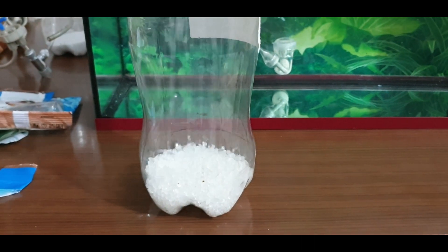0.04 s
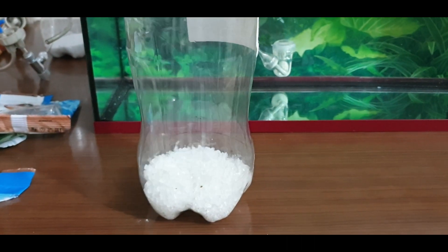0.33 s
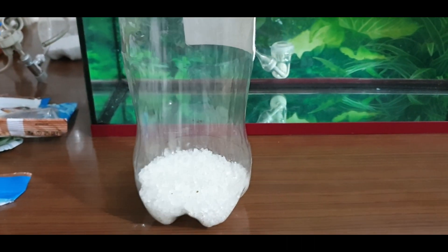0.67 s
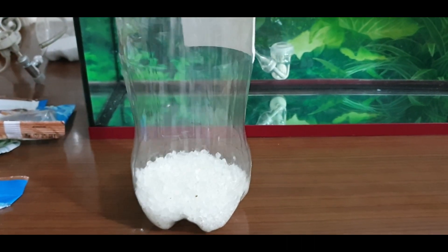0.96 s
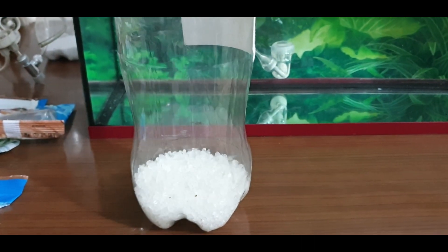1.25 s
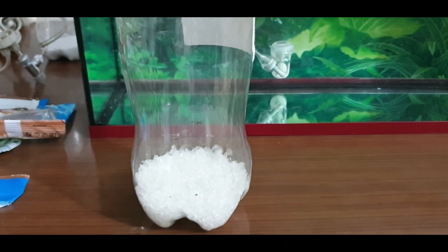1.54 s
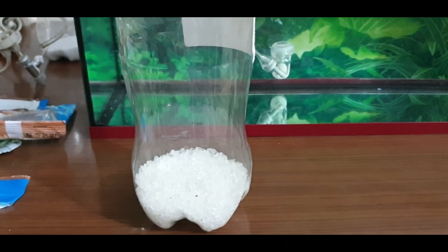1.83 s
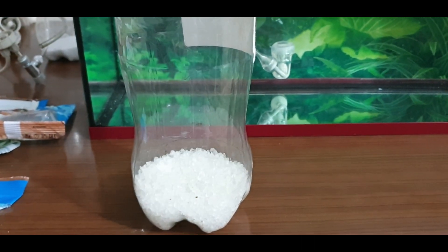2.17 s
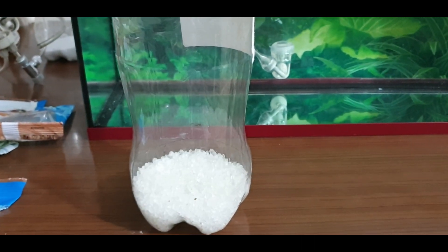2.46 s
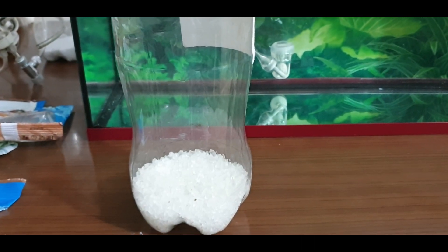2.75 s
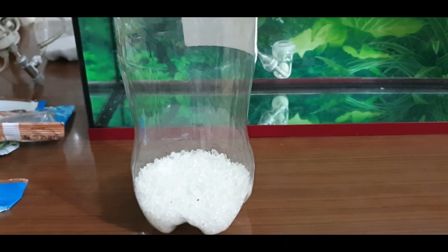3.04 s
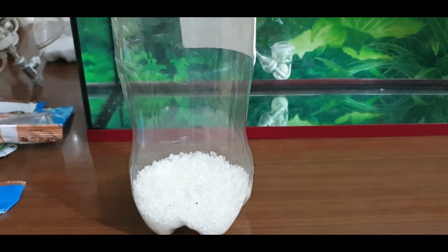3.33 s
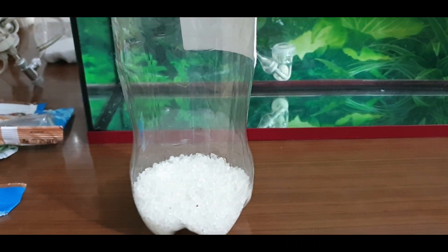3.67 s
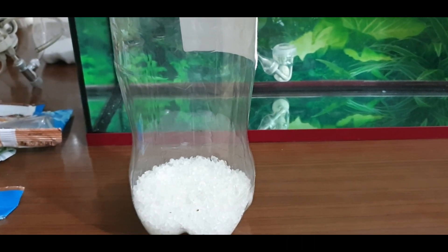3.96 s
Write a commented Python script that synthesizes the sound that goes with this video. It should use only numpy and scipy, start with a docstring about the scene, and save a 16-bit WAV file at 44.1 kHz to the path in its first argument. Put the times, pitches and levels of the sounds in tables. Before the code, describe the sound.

A bright rattle of crystals poured into a plastic bottle dwindles to sparse crackles.

```python
"""Crystals poured into a plastic bottle

Dry crystals pour into a thin plastic bottle on a table, in a small quiet room. Each landing rings the
wall, knocks the bottle and adds a bright tick; the small grains also thud on the heap. After two
seconds the dense rattle thins out to single ticks and crackles. Now and then a low hollow hum swells
up, probably the air in the bottle as it is jostled."""
import sys
import numpy as np
from scipy import signal
from scipy.fft import rfft, irfft
from scipy.io import wavfile
from scipy.ndimage import uniform_filter1d

SR = 44100
rng = np.random.default_rng(int(sys.argv[2]) if len(sys.argv) > 2 else 0)


def digitize_waveform(pressure):
    """Quantize a signal to 16-bit integers and store it at the path in sys.argv[1].

    Rows of a 2-D input are taken as channels; values are limited to [-1, 1].
    """
    field = np.atleast_2d(pressure).T
    bounded = np.clip(field, -1, 1)
    quanta = np.round(bounded * 32767).astype(np.int16)
    wavfile.write(sys.argv[1], SR, quanta)


N = 176400
IMPACT_SAMPLES = 2048
TIME = np.arange(N) / SR
IMPACT_HZ, SCENE_HZ = np.fft.rfftfreq(IMPACT_SAMPLES, 1 / SR), np.fft.rfftfreq(N, 1 / SR)

# Tone of the thin wall's ring: (frequency [Hz], gain [dB])
WALL_EQ = [(400, -31), (1000, -9.5), (1350, -7), (1750, 1), (2100, -1.5), (2430, 1.5), (2900, -2.5),
           (3700, 0), (4900, -1.5), (6200, -9.5), (8000, -15), (16000, -25.5)]
# Tone of the whole bottle's knock: (frequency [Hz], gain [dB])
KNOCK_EQ = [(120, -50), (300, -26.5), (420, -10), (620, -8.5), (760, -5.5), (860, 2), (1020, -3),
            (1280, -6), (1700, -20.5), (3000, -36)]
# Tone of the bright contact tick: (frequency [Hz], gain [dB])
TICK_EQ = [(2500, -77), (5500, 3), (8000, -6), (10000, -3.5), (12500, 0), (15800, -2)]
# Tone of the dull thud on the heap: (frequency [Hz], gain [dB])
HEAP_EQ = [(100, -40.5), (300, -16.5), (410, -2.5), (470, 2), (600, -6.5), (720, 1.5), (860, 7),
           (1000, -15.5), (2000, -68.5)]
# Envelope of the stream of small grains: (time [s], level [dB])
FLOW_ENVELOPE = [(0, -24.5), (.11, -25), (.2, -31), (.29, -31), (.39, -29), (.5, -26), (.9, -28.5),
                 (1.3, -30), (1.6, -31), (1.75, -32), (1.85, -41.5), (2.0, -50), (2.1, -49.5), (2.2, -61.5),
                 (2.6, -62), (2.9, -58), (3.0, -65), (3.35, -49.5), (3.56, -70), (3.62, -59), (4.0, -57.5)]
# Swells of the low hum: (time [s], relative boom level [dB], relative note level [dB])
HUM_ENVELOPE = [(0.0, -43, -47), (0.04, -61, -52), (0.22, -55, -58), (0.51, -57.5, -65.5), (0.7, -56, -53),
                (0.78, -55, -67), (0.98, -57, -46), (1.02, -46.5, -58), (1.27, -45, -40.5),
                (1.51, -60, -57.5), (1.55, -56, -61), (1.95, -61, -46.5), (1.99, -73, -72),
                (2.43, -73, -88), (2.53, -54.5, -49), (2.76, -73, -77), (2.86, -55, -75), (2.99, -84, -76),
                (3.1, -55.5, -56), (3.35, -53, -41), (3.39, -55.5, -38.5), (3.74, -83, -80),
                (3.93, -72, -72), (4.0, -66, -89)]
# Tone of the hum's broad boom: (frequency [Hz], gain [dB])
BOOM_EQ = [(25, -42), (55, -19.5), (80, -16), (97, 2.5), (110, -16), (125, -2), (160, -19), (178, -7.5),
           (197, -16), (212, -9), (228, -8), (245, -16.5), (300, -18.5), (500, -47)]
# Landings of the larger crystals: (time [s], relative ring level [dB], ring pitch [Hz],
# knock re ring [dB], tick re ring [dB], decay time [s])
CRYSTAL_HITS = [(0.0174, -21.5, 2530, -15, -23, 0.0014), (0.0392, -25.5, 2930, -2, -20, 0.0013),
                (0.0736, -25, 2960, -14.5, -20, 0.006), (0.113, -27.5, 2380, -19, -17, 0.0034),
                (0.126, -28, 2770, -6, -13, 0.0035), (0.2273, -20, 2660, -15, -12, 0.0008),
                (0.42, -28, 4000, -33, -12, 0.004), (0.466, -29.5, 2420, -6, -18, 0.0014),
                (0.495, -27.5, 3100, -5, -19, 0.0044), (0.535, -45, 2730, -22, -18, 0.0014),
                (0.7125, -26, 2240, -5, -22, 0.0052), (0.77, -31, 3280, -30, -19, 0.005),
                (0.8675, -28, 3600, -23, -5, 0.0049), (0.982, -26.5, 4000, -12, -13, 0.0026),
                (1.0723, -23.5, 3000, -13, -10, 0.0039), (1.14, -23, 2220, -17, -13, 0.0095),
                (1.252, -29, 2600, -30, -18, 0.0035), (1.3222, -20.5, 1960, -7, -15, 0.0031),
                (1.367, -25, 2690, -10, -8, 0.0041), (1.3967, -23, 2420, -6, -20, 0.0014),
                (1.436, -27, 2580, -11.5, -8.5, 0.0042), (1.5234, -27, 3620, -7.5, -25, 0.011),
                (1.5633, -25.5, 2560, -13, -17, 0.0016), (1.6826, -28.5, 4070, -39, -2.5, 0.0019),
                (1.716, -30, 2330, -21, -10, 0.0028), (1.7728, -29.5, 2400, -7, -22, 0.0043),
                (1.8163, -32.5, 2050, -4, -14, 0.0033), (1.842, -36, 3970, -7, -2, 0.0021),
                (1.8606, -27.5, 2020, -7.5, -12, 0.002), (1.893, -40, 2400, -23, -1.5, 0.0034),
                (1.919, -42.5, 3150, 1, -8, 0.0047), (1.934, -34, 3880, -15, -6, 0.0026),
                (1.9504, -37, 4090, -9.5, -7, 0.0043), (1.98, -36, 3860, -6, 5.5, 0.0012),
                (1.989, -30, 2270, -11, -28, 0.0071), (2.031, -37, 3660, -4, -9, 0.0026),
                (2.0498, -26, 3900, -24, -9, 0.00168), (2.063, -43.5, 3410, -1.5, 4, 0.003),
                (2.1217, -41, 2190, -12, 2, 0.0017), (2.1617, -47.5, 2240, -6.5, 4, 0.0043),
                (2.1917, -42.5, 2910, -16, -3, 0.0027), (2.247, -33, 3440, -19, -14.5, 0.0027),
                (2.298, -54, 4000, -17, 5, 0.00085), (2.308, -48.5, 4490, -12, -6, 0.0024),
                (2.3405, -30, 3500, -19, -14, 0.0023), (2.354, -41.5, 3080, -7, -21, 0.0019),
                (2.4634, -34, 2000, -11.5, -20, 0.0043), (2.469, -39, 1920, -19, -19, 0.0035),
                (2.5055, -50.5, 4000, -7, 3.5, 0.00063), (2.581, -49.5, 2300, -17, -17, 0.0017),
                (2.6265, -38.5, 3420, -44, -6.5, 0.00094), (2.6584, -41.5, 2760, -16.5, 2.5, 0.002),
                (2.6967, -41, 3000, -22, -0.5, 0.0045), (2.734, -47, 2140, -14, -1.5, 0.0035),
                (2.7663, -42, 3720, -25, -11, 0.0039), (2.7953, -46.5, 1920, 0, -10, 0.0043),
                (2.8005, -44, 2420, -12, -21, 0.0023), (2.8553, -34.5, 2900, -15.5, 1, 0.0012),
                (2.8835, -38, 2670, -20, -6, 0.0043), (2.8878, -45.5, 2460, -23, 0, 0.0055),
                (2.9093, -41.5, 3400, -13.5, -1, 0.0043), (2.92, -43.5, 3430, -12, -0.5, 0.0033),
                (2.968, -57.5, 2100, 5.5, -9, 0.001), (2.983, -52, 2530, -14, 2, 0.002),
                (3.0227, -46.5, 2700, -7.5, -8, 0.0013), (3.0509, -52.5, 2400, -4, -4, 0.006),
                (3.0884, -48, 3600, -9, -11, 0.004), (3.1085, -35.5, 3130, -15, 1, 0.0015),
                (3.129, -51.5, 2700, 4, -13, 0.0041), (3.157, -46, 3690, -8, -3, 0.0041),
                (3.2002, -39, 3200, -11.5, -7, 0.0027), (3.2123, -45.5, 2660, -11.5, -1, 0.0025),
                (3.3054, -41, 2880, -42, 0.5, 0.00136), (3.33, -44, 2930, -43, -11, 0.0011),
                (3.3545, -44.5, 3300, -10, -8, 0.0022), (3.391, -43, 1700, -8, -13, 0.0034),
                (3.4637, -35, 2700, -13, -15, 0.0019), (3.48, -53, 2520, -8, 9.5, 0.0019),
                (3.5066, -41.5, 3830, -27, -3, 0.0036), (3.5307, -40, 4240, -25, -7, 0.0049),
                (3.5516, -48.5, 3560, -2, 0, 0.011), (3.6166, -35.5, 3680, -18, -5, 0.0036),
                (3.6337, -28, 3000, -26, -7, 0.0016), (3.6973, -24, 2530, -20.5, -5.5, 0.0011),
                (3.705, -50, 2500, -4, -8, 0.0027), (3.713, -55, 2210, 10, -8, 0.0043),
                (3.7726, -44.5, 4160, -17, -1, 0.0022), (3.7882, -34.5, 3100, -15.5, -14, 0.0031),
                (3.8203, -38.5, 3460, -13.5, -10, 0.00073), (3.9216, -43, 2030, -1.5, -33, 0.0031),
                (3.932, -43, 2040, -5.5, -15, 0.0034)]
# Clacks that leave a ping in the wall: (time [s], pitch [Hz], peak level [dB], T60 [s])
WALL_PINGS = [(.2292, 2370, -10.5, 0.015), (1.439, 2490, -16, 0.045), (1.748, 2166, -21, 0.043),
              (2.0505, 2460, -20.5, 0.016), (2.1215, 2050, -30, 0.028), (2.343, 3880, -30, 0.033),
              (3.6977, 2510, -19.5, 0.018)]
# Length of the room's tail: (frequency [Hz], T60 [s])
REVERB_T60 = [(150, 0.35), (700, 0.46), (2000, 0.23), (4500, 0.28), (9000, 0.19), (15000, 0.15)]
# Tone of the room's tail: (frequency [Hz], gain [dB])
REVERB_EQ = [(150, 2), (700, -4), (2000, 0), (4500, -3), (9000, -0.5), (15000, 0)]
# Tone of the quiet background: (frequency [Hz], gain [dB])
BACKGROUND_EQ = [(20, -11), (60, 8), (120, -13), (300, 3.5), (900, 5), (2500, -50), (5000, -28),
                 (7000, -25), (16000, -24)]
# Colour difference between the microphones: (frequency [Hz], left minus right [dB])
MIC_BALANCE = [(100, 0.7), (330, -1.5), (500, 4), (770, -1), (1170, -2.5), (1790, -6), (2350, -2),
               (2900, -0.5), (4200, -.5), (6400, 0.5), (8800, 5.5), (10500, 7), (13000, -0.5), (15500, 3)]


def amp(db):
    """Decibels to gain."""
    return 10 ** (np.asarray(db) / 20)


def unit_rms(x):
    """Scales to rms 1."""
    return x / np.sqrt(np.mean(x ** 2) + 1e-30)


def curve(points, hz):
    """Reads a table on a log-frequency axis."""
    freqs, values = np.transpose(points)
    return np.interp(np.log(hz + 1), np.log(freqs + 1), values)


def add(mix, start, sound):
    """Mixes in a stereo sound at a time in seconds."""
    part = mix[:, max(round(start * SR), 0):][:, :sound.shape[1]]
    part += sound[:, :part.shape[1]]


def min_phase(db):
    """Minimum-phase response with the given gains."""
    log_gain = np.log(amp(np.r_[db, db[-2:0:-1]]))
    return np.exp(np.conj(signal.hilbert(log_gain)))[:len(db)]


def stereo(left, other, correlation):
    """Blends two independent noises into a pair; correlation 1 is mono."""
    return np.array([left, correlation * left + np.sqrt(1 - correlation ** 2) * other])


def noise(db, correlation):
    """Steady stereo noise of a given spectrum, at rms 1."""
    shaped = irfft(rfft(rng.standard_normal((2, N))) * amp(db), N)
    return unit_rms(stereo(*shaped, correlation))


WALL_BODY, KNOCK_BODY, TICK_BODY, HEAP_BODY = [
    min_phase(curve(eq, IMPACT_HZ)) for eq in (WALL_EQ, KNOCK_EQ, TICK_EQ, HEAP_EQ)]


def strike(body, decay_s, rise_share=0.401, correlation=0, snap=0):
    """A brief rattle, plus one hard contact of strength snap, rings a body; energy 1 per channel."""
    t, rise_s = np.arange(IMPACT_SAMPLES) / SR, rise_share * decay_s
    rattle = stereo(*rng.standard_normal((2, IMPACT_SAMPLES)), correlation)
    rattle *= (1 - np.exp(-t / rise_s)) * np.exp(-t / decay_s)
    rattle /= np.linalg.norm(rattle, axis=1, keepdims=True)
    arrival_s = rise_s + 0.000297 * rng.random((2, 1))  # near the rattle's peak, different per side
    contact = snap * np.exp(-2j * np.pi * IMPACT_HZ * arrival_s)
    sound = irfft((rfft(rattle) + contact) * body)
    return sound / np.linalg.norm(sound, axis=1, keepdims=True)


def impact(hz, knock_db, tick_db, decay_s, broad_q=0.87, sharp_q=5.9):
    """One crystal lands: a ringing patch of wall, a knock of the whole bottle and a tick."""
    s = 1j * IMPACT_HZ / hz
    broad = s / (broad_q * (s * s + 1) + s)
    sharp = s / (sharp_q * (s * s + 1) + s)
    ring = strike((broad + 0.65 * sharp) * WALL_BODY, decay_s, snap=0.6)
    knock = strike(KNOCK_BODY, decay_s, correlation=1)
    tick = strike(TICK_BODY, decay_s, rise_share=0.2533, snap=0.87)
    return ring + amp(knock_db) * knock + amp(tick_db) * tick


def grain(pitch, knock, tick, length, decay_s=0.0012):
    """A small grain hits the wall and thuds on the heap; four random offsets vary its character."""
    hit = impact(hz=3000 * 2 ** (0.38 * pitch), knock_db=-15 + 4.5 * knock,
                 tick_db=-7.5 + 4.5 * tick, decay_s=decay_s * np.exp(0.27 * length))
    thud = strike(HEAP_BODY, decay_s, correlation=1)
    return hit + amp(-13) * thud


def grain_stream(variants=160, size_spread_db=4.5, bunch_db=1.5, bunch_s=0.012):
    """Small grains land at random in little bunches, more often and harder as the flow grows."""
    grains = [grain(*offsets) for offsets in rng.standard_normal((variants, 4))]
    flow_db = np.interp(TIME, *np.transpose(FLOW_ENVELOPE))
    mean_rate = 1100 * amp(flow_db + 33) ** 0.55  # 1100 grains a second at a flow of -33 dB
    size = unit_rms(amp(size_spread_db * np.minimum(rng.standard_normal(N), 2)))
    gain = size * amp(flow_db) * np.sqrt(SR / mean_rate)
    bunch_times = np.arange(0, N / SR + 0.1, bunch_s)
    bunching = unit_rms(amp(bunch_db * rng.standard_normal(2000))) ** 2
    rate = mean_rate * np.interp(TIME, bunch_times, bunching[:len(bunch_times)])
    pick, out = rng.integers(0, variants, N), np.zeros((2, N))
    for i in np.flatnonzero(rng.random(N) < rate / SR):
        add(out, i / SR, gain[i] * grains[pick[i]])
    return out


def hollow_hum(note_hz=125.8, half_width_hz=3.6):
    """A broad boom and one narrow hollow note swell and fade, probably the air in the bottle."""
    def levelled(x, window):
        power = uniform_filter1d(uniform_filter1d((x ** 2).mean(0), window), window)
        return x / np.sqrt(power + 1e-9)
    times, boom_db, note_db = np.transpose(HUM_ENVELOPE)
    note_eq = -20 * np.log10(1 + ((SCENE_HZ - note_hz) / half_width_hz) ** 2)
    boom = levelled(noise(curve(BOOM_EQ, SCENE_HZ), correlation=0.87), window=2000)
    note = levelled(noise(note_eq, correlation=0.99), window=1000)
    boom *= amp(np.interp(TIME, times, boom_db) + 1.5)
    note *= amp(np.interp(TIME, times, note_db) - 2)
    return boom + note


def large_crystals(trim_db=4.5):
    """The larger pieces strike the bottle, one impact each."""
    out = np.zeros((2, N))
    spread = np.sqrt(0.006 * SR)  # turns energy 1 into rms 1 over 6 ms
    for start, db, hz, knock_db, tick_db, decay_s in CRYSTAL_HITS:
        add(out, start, amp(db + trim_db) * spread * impact(hz, knock_db, tick_db, decay_s))
    return out


def wall_pings():
    """One mode of the wall rings on briefly, reaching the two microphones out of step."""
    out, t = np.zeros((2, N)), np.arange(2 * IMPACT_SAMPLES) / SR
    phase_lag = np.array([[0], [np.pi / 3]])
    for start, hz, db, t60 in WALL_PINGS:
        add(out, start, amp(db) * 1000 ** (-t / t60) * np.sin(2 * np.pi * hz * t - phase_lag))
    return out


def room(x, build_up_s=0.0034, reflection_s=0.0095, reflection_db=-24):
    """One near reflection and a short diffuse tail that dies sooner in the treble."""
    hz, t, bands = signal.stft(rng.standard_normal((2, SR // 2)), SR, nperseg=256)
    fade = amp(-60 * t / curve(REVERB_T60, hz)[:, None])
    fade /= np.sqrt((fade ** 2).mean(1, keepdims=True))
    fade *= amp(curve(REVERB_EQ, hz))[:, None]
    response = signal.istft(bands * fade, SR)[1] / np.sqrt(SR / 2)
    response *= np.minimum(np.arange(response.shape[1]) / SR / build_up_s, 1)
    add(response, reflection_s, amp(reflection_db) * np.ones((2, 1)))
    return signal.fftconvolve(x, response, axes=1)[:, :N]


def shifting_room(x, places=6):
    """The landing place keeps shifting, so the sound hops between different paths through the room."""
    place = rng.integers(0, places, N // 256 + 1).repeat(256)[:N]
    sends = [uniform_filter1d(1.0 * (place == k), size=128) for k in range(places)]
    return sum(room(x * send) for send in sends)


def scene():
    """The pour, its room, the hum and the quiet background."""
    crystals = large_crystals() + wall_pings()
    pour = grain_stream()
    reverb = shifting_room(amp(-2) * crystals + pour)  # single crystals sit a little drier
    hum = hollow_hum()
    background = amp(-66.5) * noise(curve(BACKGROUND_EQ, SCENE_HZ), correlation=0.62)
    return crystals + pour + reverb + hum + background


def record(dry, cutoff_hz=15850):
    """Each microphone adds its own colour; a steep low-pass trims the very top."""
    lean_db = curve(MIC_BALANCE, IMPACT_HZ) / 2
    microphones = irfft([min_phase(lean_db), min_phase(-lean_db)])
    coloured = signal.oaconvolve(dry, microphones, axes=1)[:, :N]
    low_pass = signal.firwin(401, cutoff_hz, window=("kaiser", 9), fs=SR)
    return signal.oaconvolve(coloured, low_pass[None], "same")


dry = scene()
out = record(dry)
digitize_waveform(out)
```